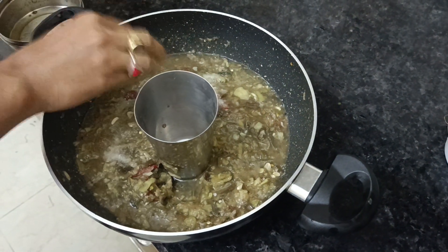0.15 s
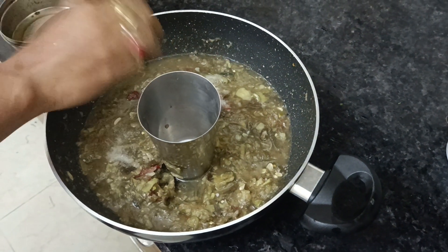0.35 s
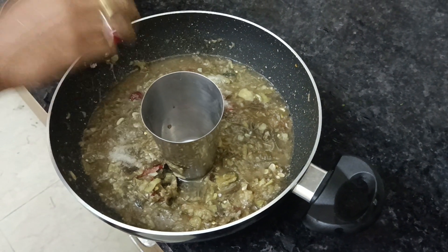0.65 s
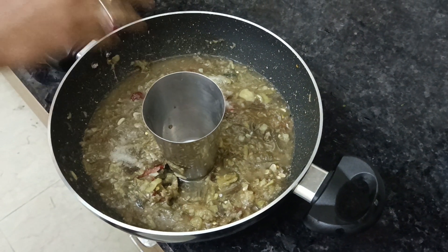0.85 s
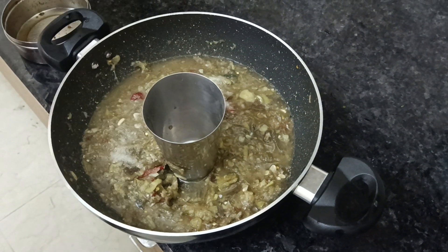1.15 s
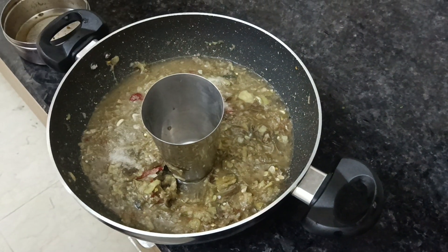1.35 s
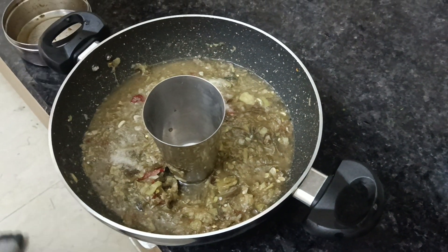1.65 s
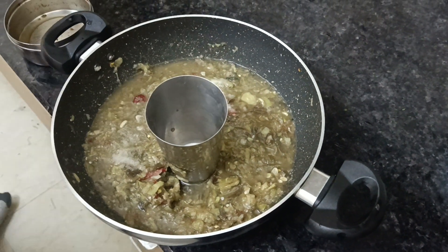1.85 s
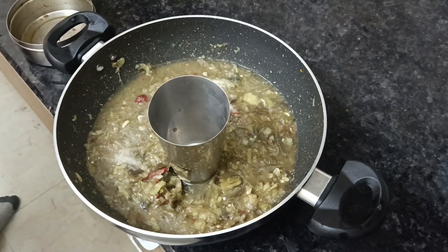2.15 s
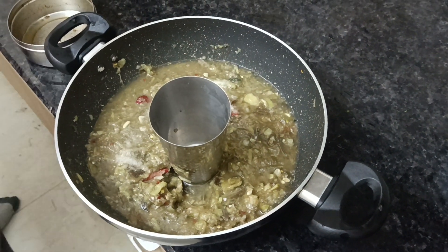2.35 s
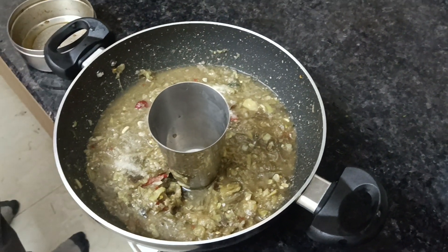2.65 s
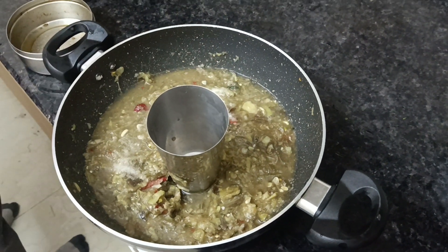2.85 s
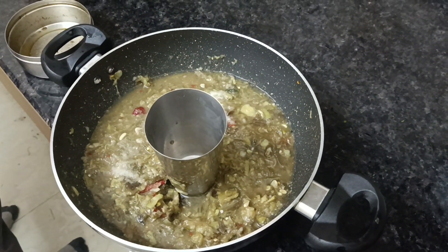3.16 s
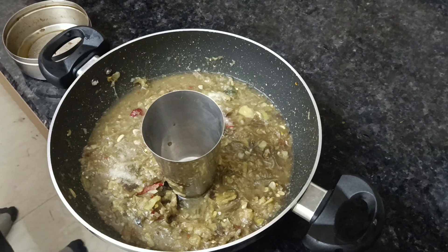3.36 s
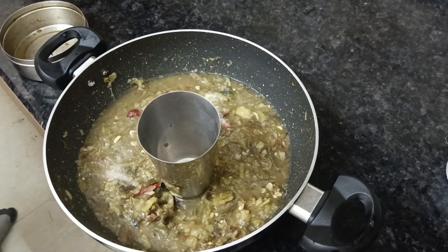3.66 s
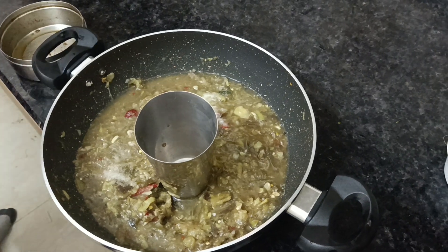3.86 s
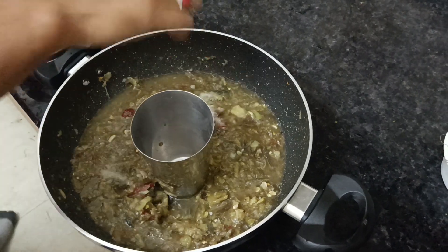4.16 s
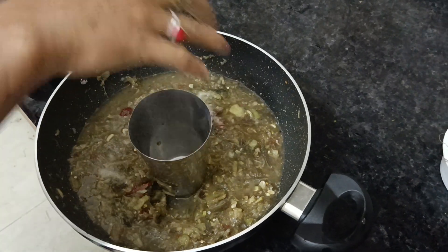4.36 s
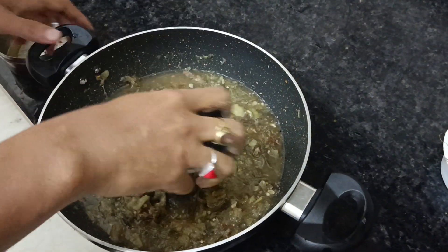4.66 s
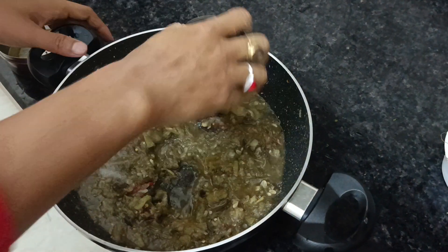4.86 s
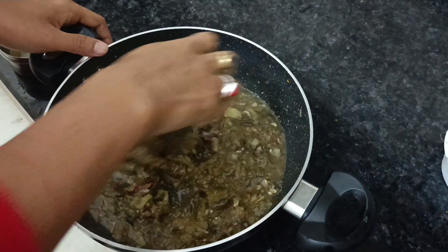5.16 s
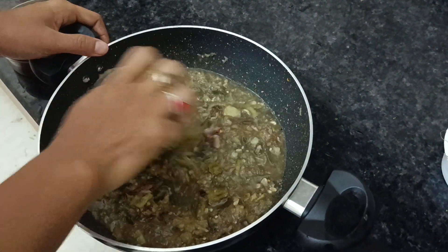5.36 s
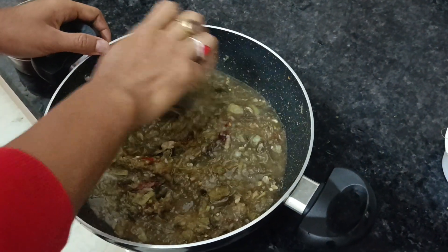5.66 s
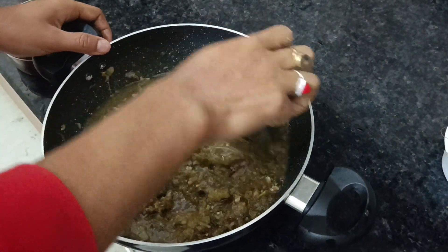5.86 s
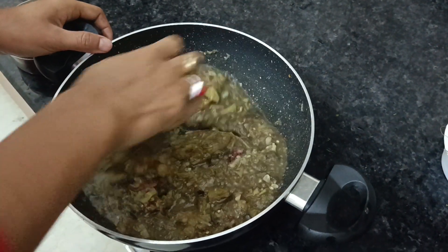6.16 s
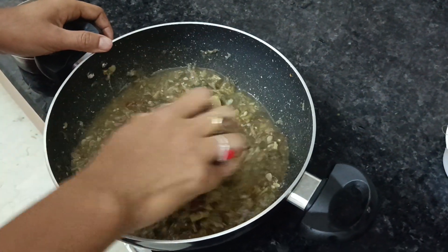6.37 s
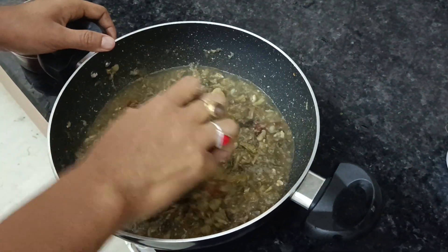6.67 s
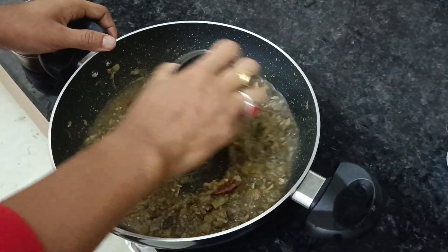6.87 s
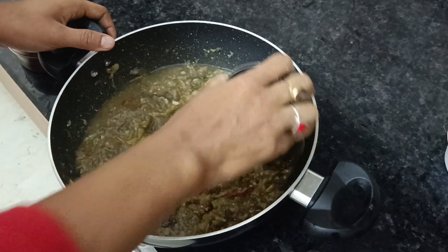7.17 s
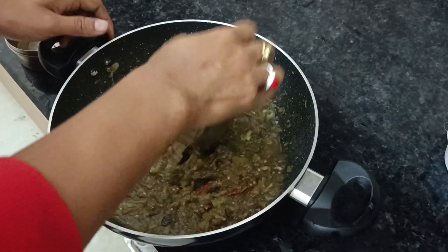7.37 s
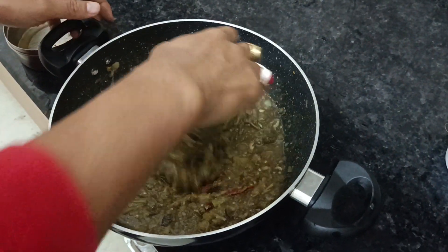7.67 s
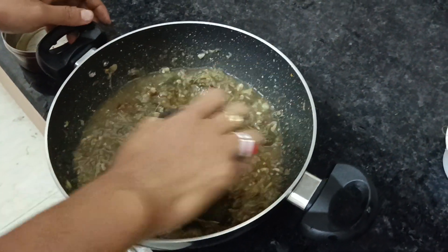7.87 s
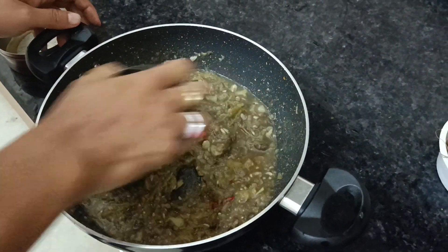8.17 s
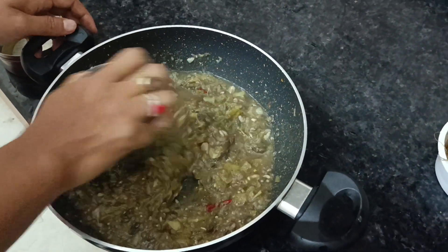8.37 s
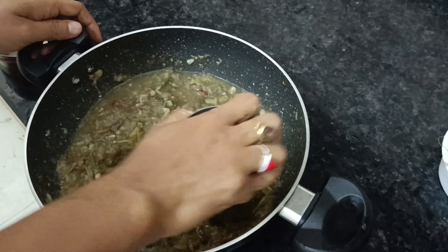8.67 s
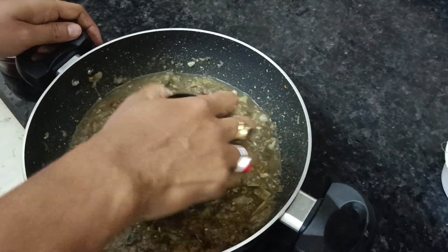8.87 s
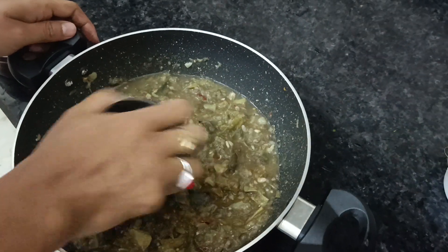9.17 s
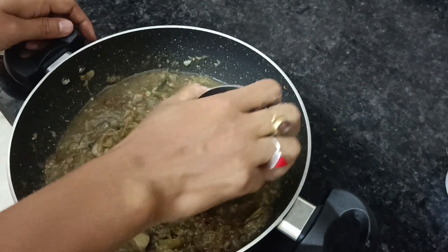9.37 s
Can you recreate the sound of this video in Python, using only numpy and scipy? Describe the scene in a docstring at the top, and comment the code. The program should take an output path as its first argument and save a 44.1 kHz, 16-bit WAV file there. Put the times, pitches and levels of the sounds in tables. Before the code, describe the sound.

First a few tiny taps and metallic ticks, then snapping, rustling thin plastic and a low double thud as something soft and heavy is put down. A near-silent gap follows. Then irregular wet presses: air pops ring the hollow of a steel tumbler around a mid-low pitch, pulp crackles, and its rim clinks damply on the pan, once stuttering. Close pickup, short bright kitchen reverberation, faint hiss and low hum.

```python
"""Tumbler mashing wet vegetables

A steel tumbler presses a wet mixture in a pan, in a small hard-walled kitchen with hiss and a rising drone.
Early on come light ticks (ringing modes), crumpling thin plastic (snap swarms) and the thud of a load put down.
Presses pop trapped air, which rings the tumbler's hollow, while the pulp crackles and bubbles.
In between, steel clinks (click bursts through modes) and once judders on the pan."""
import sys
import numpy as np
from scipy import signal
from scipy.fft import rfft, irfft
from scipy.io import wavfile

SR = 44100
rng = np.random.default_rng(int(sys.argv[2]) if len(sys.argv) > 2 else 0)


def wav_out(sig):
    """Save sig, one row per channel (or a flat mono array), as 16-bit PCM at SR to the path in sys.argv[1]."""
    wavfile.write(sys.argv[1], SR, np.round(np.clip(np.atleast_2d(sig).T, -1, 1) * 32767).astype(np.int16))


N = 419832
SIZE = 32768  # samples per event
T = np.arange(SIZE) / SR


def undb(db):
    """Amplitude factor of a level in dB."""
    return 10 ** (np.asarray(db) / 20)


def unit(x):
    """Scale to an energy of 1."""
    return x / np.sqrt(np.sum(x ** 2) + 1e-18)


def at_hz(points, hz):
    """Read a (f/Hz, value) table on a log-frequency axis."""
    f, value = np.transpose(points)
    return np.interp(np.log(hz + 1), np.log(f), value)


def colour(x, points):
    """Minimum-phase filter with a (f/Hz, gain/dB) spectrum, by folding the cepstrum."""
    size = x.shape[-1]
    gain = undb(at_hz(points, np.fft.rfftfreq(size, 1 / SR)))
    cepstrum = irfft(np.log(gain), size)
    cepstrum[1:size // 2] *= 2
    cepstrum[size // 2 + 1:] = 0
    return irfft(rfft(x) * np.exp(rfft(cepstrum)), size)


def low_cut(x, hz):
    """Second-order high-pass."""
    return signal.sosfilt(signal.butter(2, hz, "high", fs=SR, output="sos"), x)


def drive(force, response):
    """Convolve a force with an impulse response."""
    return irfft(rfft(force, 2 * SIZE) * rfft(response, 2 * SIZE))[..., :SIZE]


def ring(modes, scatter_db, detune=0):
    """Sum of decaying modes; the point of contact and the grip shift their weights and pitches."""
    t, out = T.astype(np.float32), 0
    draws = rng.standard_normal((len(modes), 3))
    for (hz, db, t60), (weight, shift, sign) in zip(modes, draws):
        fade = np.exp(-np.minimum(float(np.log(1000) / t60) * t, 20))
        wave = np.sin(float(2 * np.pi * hz * (1 + detune * shift)) * t)
        amplitude = float(np.sign(sign) * undb(db + scatter_db * weight))
        out = out + amplitude * fade * wave
    return unit(out)


def clicks(length, rate, scatter_db, first=0, rise=0):
    """Random clicks at rate/Hz, swelling over the share 'rise'; an opening one has the energy share 'first'."""
    levels_db = scatter_db * np.minimum(rng.exponential(size=SIZE), np.pi)
    sizes = undb(levels_db) * rng.choice([-1, 1], SIZE)
    progress = T / max(length, 1 / SR)
    gate = np.exp(-progress ** 4) * np.minimum(progress / max(rise, 1e-6), 1)
    hits = rng.random(SIZE) < rate / SR
    share = np.clip(first, 0, 1)
    train = np.sqrt(1 - share) * unit(sizes * hits * gate)
    train[0] += np.sqrt(share)
    return train


def bubbles(length, low_hz, high_hz, cycles, count):
    """Tiny bubbles burst at random moments, each a short chirp gliding upwards."""
    out, t = np.zeros(2 * SIZE), T[:SIZE // 32]
    for when, pitch, size in rng.random((count, 3)):
        hz = low_hz * (high_hz / low_hz) ** pitch
        age = t * hz / cycles
        glide = 1 + .1 * np.tanh(age / 2)
        start = int(when * min(length, T[-1]) * SR)
        out[start:start + len(t)] += size ** 2 * np.exp(-age) * np.sin(2 * np.pi * hz * t * glide)
    return unit(out[:SIZE])


PORT_GAP_M, SOUND_SPEED_M_PER_S = 0.18, 343


def diffuse(size):
    """Noise arriving from all sides at two ports: alike in the bass, unrelated in the treble."""
    likeness = np.sinc(2 * np.fft.rfftfreq(size, 1 / SR) * PORT_GAP_M / SOUND_SPEED_M_PER_S)
    mid, side = rfft(rng.standard_normal((2, size)))
    mid = mid * np.sqrt(1 + likeness)
    side = side * np.sqrt(1 - likeness)
    return irfft(np.array([mid + side, mid - side]), size) / np.sqrt(2)


# room decay: (f/Hz, t60/s)
ROOM_T60 = [(100, 0.66), (500, 0.47), (1500, 0.43), (3500, 0.37), (7000, 0.34), (15000, 0.19)]
DIRECT_DB, CEILING_DB, CEILING_S = -3.5, -9, 0.011
PORT_LAG_S, TAIL_ONSET_S = .00032, 0.00043


def room():
    """Direct path, ceiling echo and a tail whose treble dies first."""
    hz, s, cells = signal.stft(diffuse(SIZE), SR)
    fade = undb(-60 * s / at_hz(ROOM_T60, hz)[:, None])
    tail = signal.istft(cells * fade, SR)[1][:, :SIZE] * (1 - np.exp(-T / TAIL_ONSET_S))
    response = np.sqrt(2) * unit(tail)
    response[0, 0] += undb(DIRECT_DB)
    response[1, int(PORT_LAG_S * SR)] += undb(DIRECT_DB)
    response[:, int(CEILING_S * SR)] += undb(CEILING_DB)
    return response


def band_levels(db, balance_db, brightness_db=0, tilt=0):
    """Band levels of one event from its level, its material's balance and its brightness."""
    return db + np.array(balance_db) + brightness_db * np.array(tilt)


# low, middle, high, top band: (from f/Hz, to f/Hz)
BANDS = [(250, 900), (900, 3500), (3500, 9000), (9000, 16000)]
BAND_FILTERS = [signal.butter(4, band, "band", fs=SR, output="sos") for band in BANDS]


def voiced(x, length, levels_db):
    """Tilt a sound smoothly until its upper bands approach the given levels while it lasts."""
    count = len(levels_db)
    centres = np.sqrt(np.prod(BANDS, axis=1))[-count:]
    body = int((length + .03) * SR)
    x = x * np.minimum(10 * (1 - T / T[-1]), 1)  # end fade
    for _ in range(2):
        mono = x.mean(axis=0)[:body]
        rms = np.array([np.std(signal.sosfilt(sos, mono)) for sos in BAND_FILTERS[-count:]])
        now_db = 20 * np.log10(rms + 1e-12)
        x = colour(x, np.column_stack([centres, np.subtract(levels_db, now_db)]))
    return x


# hiss spectrum before low cut and scaling: (f/Hz, relative level/dB)
HISS_SPECTRUM = [(18, -74), (30, -39), (70, -34), (81, 5.5), (100, 7.5), (170, -10), (311, -8.5),
                 (384, -17), (600, -18), (1430, -20.5), (2980, -21), (6210, -31.5), (8520, -29.5),
                 (9460, -41), (16000, -27.5)]
HISS_DB, DRONE_DB, DRONE_RISE_DB_PER_S = -60, -60, 0.63


def background():
    """Faint even hiss of the kitchen over a low, slowly growing drone, both filtered diffuse noise."""
    hiss = low_cut(colour(diffuse(N), HISS_SPECTRUM), hz=165)
    drone_spectrum = [(25, -47), (50, -23.0), (75, -22.0), (97, 3.0), (108, -3), (135, -20.0), (300, -37.5)]
    drone = colour(diffuse(N), drone_spectrum)
    drone_db = DRONE_DB + DRONE_RISE_DB_PER_S * np.arange(N) / SR
    hiss = undb(HISS_DB) * hiss / np.std(hiss.mean(axis=0))
    return hiss + undb(drone_db) * drone / np.std(drone)


# dry taps: (t/s, f/Hz, amplitude before decay/dB)
TAPS = [(.133, 700, -41), (.328, 1870, -38.5), (.472, 2400, -39), (7.918, 320, -30.5)]


def taps():
    """Dull decaying sines of a cycle or two, too close to stir the room."""
    for s, hz, db in TAPS:
        tap = undb(db) * np.exp(-T * hz) * np.sin(2 * np.pi * hz * T)
        yield s, np.array([tap, tap])


# light metal ticks: (t/s, level/dB, brightness/dB)
TICKS = [(.245, -64.5, 10.5), (.481, -41, 3.5), (.491, -51, 1), (.684, -64, 14.5), (.7, -56, 0),
         (.885, -48.5, 0.5), (3.94, -56.5, 3), (5.382, -47, -2.5), (7.131, -47, -1)]
# small metal: (f/Hz, level/dB, t60/s)
TICK_MODES = [(2300, -9, .03), (2950, -2, .07), (3150, -5, .06), (5200, -6, .04), (5750, -2, .05),
              (6130, -2, .07), (6330, -2, .05), (7400, -6, .04), (8300, -7, .03), (10500, -4, .04),
              (11050, -4, .05), (12600, -7, .03), (14700, -7, .03)]
# hard contact before voicing, also in clinks: (f/Hz, relative level/dB)
CONTACT = [(60, -19), (300, -35), (900, -4.5), (1700, 9), (2600, 8), (4000, 6.5), (5200, 4), (6700, 8.5),
           (9400, -2), (12000, -2.5), (16000, -6.5)]
# (middle/dB, high/dB, top/dB) re event level
TICK_BALANCE_DB = (-14, -2, -5)
# harder contact trades bass for treble, also in clinks: (low, middle, high, top), dB per dB brightness
CONTACT_TILT = (-0.5, -0.68, 0.46, 1.6)


def ticks(paths):
    """Small metal touches: one sharp click and a thin ring."""
    for k, (s, db, brightness_db) in enumerate(TICKS):
        click = unit(colour(1. * (T == 0), CONTACT))
        sound = click + ring(TICK_MODES, scatter_db=2)
        levels_db = band_levels(db, TICK_BALANCE_DB, brightness_db, CONTACT_TILT[1:])
        yield s, voiced(drive(sound, paths[k % len(paths)]), 0, levels_db)


# crumples of thin plastic: (t/s, length/s, level/dB, brightness/dB)
CRUMPLES = [(1.123, 0.017, -54.5, -12), (1.172, 0.027, -47, -6.5), (1.231, 0.05, -32, 0),
            (1.287, 0.051, -29.5, -1.5), (1.365, 0.25, -43, 1.5), (1.464, 0.041, -28, -6),
            (1.535, 0.021, -37, 1.5), (1.778, 0.094, -38, -5), (1.912, 0.016, -39, 1.5),
            (1.946, .005, -38.5, 8.5), (2.02, 0.2, -49, -5.5), (2.104, 0.017, -36.5, 2),
            (2.15, 0.017, -38, 2), (2.351, 0.01, -45.5, 7.5), (2.48, 0.023, -54, 0),
            (2.516, 0.022, -41, -7), (2.543, 0.069, -37.5, 3.5), (2.635, 0.054, -42, 2),
            (2.718, .1, -39.5, 0), (2.885, 0.023, -46, -4), (2.999, 0.16, -41, 4.5),
            (3.049, 0.045, -28.5, -5.5), (3.17, 0.069, -51.5, -5), (3.429, 0.012, -44.5, 9.5),
            (3.78, 0.0033, -53, -1.5)]
# plastic is handled: (from t/s, to t/s)
HANDLINGS = [(1.2, 1.65), (1.97, 3.32)]
# snap spectrum before voicing: (f/Hz, relative level/dB)
PLASTIC = [(50, -33), (110, -3), (500, 0.5), (800, -2), (1500, 0), (2450, 1), (3200, -4.5), (5000, -10.5),
           (7000, -13.5), (9400, -29.5), (12000, -31), (16000, -36)]
# (low/dB, middle/dB, high/dB, top/dB) re event level
PLASTIC_BALANCE_DB = (-8, 1, -2, -8)
# sharper creases add treble: (low, middle, high, top), dB per dB brightness
CREASE_TILT = (0.049, 0.086, 0.86, 0.94)
RUSTLE_STEP_S, RUSTLE_DB, RUSTLE_SCATTER_DB, RUSTLE_BRIGHTNESS_DB = .1, -54, 6.5, -3


def bag(paths):
    """Thin plastic buckles in swarms of tiny snaps, and rustles softly all the while it is handled."""
    rustles = []
    for start, end in HANDLINGS:
        for s in np.arange(start, end, RUSTLE_STEP_S):
            db = RUSTLE_DB + RUSTLE_SCATTER_DB * rng.standard_normal()
            rustles.append((s, RUSTLE_STEP_S, db, RUSTLE_BRIGHTNESS_DB))
    for k, (s, length, db, brightness_db) in enumerate(CRUMPLES + rustles):
        snaps = colour(clicks(length, rate=1100, scatter_db=4, first=0.078, rise=0.034), PLASTIC)
        levels_db = band_levels(db, PLASTIC_BALANCE_DB, brightness_db, CREASE_TILT)
        yield s, voiced(drive(snaps, paths[k % len(paths)]), length, levels_db)


# the load lands: (t/s, level/dB)
THUDS = [(3.052, -21), (3.079, -22)]
# surface under the load: (f/Hz, level/dB before low cuts, t60/s)
THUD_MODES = [(102, -7, .3), (160, 1, .18), (202, 1, .13), (268, -4, .12), (318, -5, .12), (410, -9, .08)]


def thuds(paths):
    """A soft load lands and settles, booming in the modes of the surface under it."""
    for s, db in THUDS:
        surface = low_cut(low_cut(ring(THUD_MODES, scatter_db=0), hz=75), hz=75)
        path = undb(-4) * paths[0] + (T == 0)
        boom = low_cut(drive(surface, path), hz=70)
        yield s, undb(db) * boom / np.std(boom[:, :SR // 20])


# the hand reaches in and takes hold: (t/s, length/s, level/dB)
BRUSHES = [(4.2, 0.099, -60.5), (4.53, 0.26, -62)]
# (low/dB, middle/dB, high/dB, top/dB) re event level
SKIN_BALANCE_DB = (-18, -1.5, 0.5, 0.5)


def brushes(paths):
    """Skin and sleeve brush past in a soft swell of fine friction clicks."""
    for k, (s, length, db) in enumerate(BRUSHES):
        rubbing = low_cut(clicks(length, rate=3000, scatter_db=12, rise=0.12), hz=250)
        yield s, voiced(drive(rubbing, paths[k % len(paths)]), length, band_levels(db, SKIN_BALANCE_DB))


# the hand grips the tumbler and slides along its wall: (t/s, length/s, level/dB)
SLIDES = [(4.732, 0.054, -46)]
# thin tumbler wall: (f/Hz, level/dB, t60/s)
WALL_MODES = [(2750, 2, 0.063), (4920, -6, 0.14), (8000, 3, 0.14), (9000, -9, 0.17), (11900, -1, 0.22),
              (13000, -7, .25)]


def slides(paths):
    """Finger rings rub the tumbler's wall and make its modes sing faintly."""
    for s, length, db in SLIDES:
        rubbing = clicks(length, rate=2700, scatter_db=4, rise=0.37)
        singing = drive(drive(rubbing, ring(WALL_MODES, scatter_db=0)), paths[0])
        yield s, undb(db) * singing / np.std(singing[:, :int(length * SR)])


# steel knocks and grazes: (t/s, length/s, level/dB, brightness/dB)
CLINKS = [(4.987, 0.023, -55.5, 2.5), (5.262, 0.0045, -68, 8), (5.679, 0.0045, -33, 2),
          (5.973, 0.0073, -52.5, 1), (6.223, 0.0032, -50.5, 9.5), (6.687, 0.04, -52, 3.5),
          (7.06, 0.043, -64, 5.5), (7.2, 0.01, -43.5, 0.5), (7.435, 0.0032, -53, 0),
          (7.545, .004, -33, 1.5), (7.77, 0.0038, -58, -1.5), (7.873, 0.013, -46, -2.5),
          (8.315, 0.0028, -34, -1.5), (8.743, 0.0097, -30.5, -1.5), (8.892, 0.0075, -46, 1.5),
          (9.099, 0.0011, -21.5, -9.5), (9.473, 0.0064, -49.5, -5)]
# tumbler and pan, metal on metal, also in judders: (f/Hz, level/dB before scatter, t60/s)
STEEL_MODES = [(572, -8, .16), (646, -3, .18), (1168, -10, .05), (1370, -15, .04), (1771, -5, .16),
               (1857, -8, .08), (2143, -9, .08), (2293, -8, .15), (2471, -4, .16), (2568, -2, .22),
               (2681, -5, .16), (3144, -9, .12), (3445, -9, .08), (4700, -6, .06), (5959, -4, .07),
               (6400, -3, .06), (6767, -3, .06), (7300, -4, .06), (8500, -6, .05), (10900, -7, .06)]
# (low/dB, middle/dB, high/dB, top/dB) re event level
STEEL_BALANCE_DB = (-11, -3, -0.5, -3)


def clinks(paths):
    """The rim strikes the pan and chatters briefly; the hand and the mash damp the ring."""
    for k, (s, length, db, brightness_db) in enumerate(CLINKS):
        # the longer the graze, the less its first contact stands out
        first = 0.3 * np.exp(-length / 0.0088)
        force = clicks(length, rate=8000, scatter_db=3.0, first=first, rise=0.1)
        steel = ring(STEEL_MODES, scatter_db=3, detune=.003)
        sound = unit(colour(force, CONTACT)) + undb(-12) * unit(drive(force, steel))
        levels_db = band_levels(db, STEEL_BALANCE_DB, brightness_db, CONTACT_TILT)
        yield s, voiced(drive(low_cut(sound, hz=198), paths[k % len(paths)]), length, levels_db)


# the rim judders over the pan: (t/s, length/s, level/dB)
JUDDERS = [(9.115, .12, -28), (9.215, 0.089, -31)]
# slip spectrum before voicing: (f/Hz, relative level/dB)
RIM = [(80, -36), (400, -51), (1000, -3), (1800, 4), (2550, 6), (3200, -3), (3900, -17.5), (4700, -21),
       (5150, -47), (5700, -22.5), (6800, -16.5), (8200, -39), (10500, -29), (16000, -38)]
# (low/dB, middle/dB, high/dB, top/dB) re event level
JUDDER_BALANCE_DB = (-6.5, 2, -10, -29)


def judders(paths):
    """Pressed hard, the rim sticks and slips over the pan and sets the tumbler's hollow humming."""
    for k, (s, length, db) in enumerate(JUDDERS):
        force = clicks(length, rate=970, scatter_db=2.5, first=0.0096)
        slips = colour(force, RIM)
        steel = unit(drive(slips, ring(STEEL_MODES, scatter_db=1)))
        hollow = unit(drive(force, ring(HOLLOW_MODES, scatter_db=1)))
        sound = low_cut(unit(slips) + undb(-10) * steel + undb(-9.5) * hollow, hz=148)
        levels_db = band_levels(db, JUDDER_BALANCE_DB)
        yield s, voiced(drive(sound, paths[k % len(paths)]), length, levels_db)


# tumbler's air column and loaded pan, also in judders: (f/Hz, level/dB before scatter, t60/s)
HOLLOW_MODES = [(317, -10, .24), (408, -9, .22), (458, -11, .18), (572, -6, .18), (596, -6, .12),
                (649, -1, .2), (690, -6, .15), (754, -13, .15), (868, -11, .15), (1080, -17, .06),
                (1750, -21, .06), (2340, -23, .04)]
# pulp and wet-crackle spectra before voicing: (f/Hz, relative level/dB)
MASH = [(60, -19), (150, 26), (260, -29.5), (380, -16), (640, 8.5), (950, -11.5), (2000, -12.5),
        (4000, -36.5), (16000, -77)]
WET = [(100, -14), (700, 13), (1300, 7), (2400, 9), (3500, 2), (6500, -5), (9400, -5), (12000, 1.5),
       (16000, -20)]


def squelch(length, first, pocket_hz):
    """Air pockets pop and ring the tumbler's hollow; squeezed wet pulp crackles and bubbles."""
    pops = clicks(length, rate=540, scatter_db=6, first=first, rise=0.29)
    hollow = ring(HOLLOW_MODES, scatter_db=3, detune=.004)
    pocket = ring([(pocket_hz, 0, .025)], scatter_db=0)
    pulp = unit(colour(1. * (T == 0), MASH))
    body = low_cut(undb(-2) * hollow + pocket + undb(-2) * pulp, hz=280)
    # smaller and larger pockets collapse around the main one
    gulps = bubbles(length, low_hz=0.642 * pocket_hz, high_hz=2.25 * pocket_hz, cycles=5.2, count=7)
    crackle = colour(clicks(length + .015, rate=350, scatter_db=7, rise=.3), WET)
    fizz = bubbles(length + .03, low_hz=1100, high_hz=7500, cycles=6, count=12)
    wet = undb(-26.0) * unit(crackle) + undb(-23) * fizz
    return unit(drive(pops, body)) + undb(-11.5) * low_cut(gulps, hz=260) + wet


# presses: (t/s, length/s, first pop's energy share/0-1, air pocket f/Hz, level/dB, wet crackle/dB)
PRESSES = [(4.63, 0.088, 0.7, 657, -62, -1.5), (4.76, 0.075, 0.3, 316, -52, 0),
           (5.03, .07, 0.2, 654, -54, 5), (5.095, .029, 0.57, 680, -40.5, 1.5),
           (5.263, .019, 0.8, 650, -55.5, -9), (5.42, .07, 0.74, 566, -56.5, -2.5),
           (5.787, .038, 0.62, 538, -32, 2), (6.147, .062, 0.5, 585, -42, 2),
           (6.384, .045, 0.28, 677, -38, 2.5), (6.43, .12, 0.34, 643, -39, 2.5),
           (6.552, 0.023, 0.43, 656, -25.5, -2), (6.75, 0.12, 0.16, 650, -52, -3),
           (6.904, .026, .02, 707, -34.5, -6.5), (6.936, .014, 0.5, 684, -34.5, 2.5),
           (6.975, .033, 0.72, 595, -32.5, 1), (7.306, 0.017, 0.73, 654, -23.5, -2),
           (7.683, .026, 0.86, 469, -40.5, -4), (8.003, .03, 0.55, 508, -29, -3),
           (8.075, 0.035, 0.3, 556, -46, -7), (8.12, .03, 0, 563, -51, 1.5),
           (8.488, .038, 0.13, 477, -38, -9.5), (8.525, .032, 0.16, 477, -39, 1),
           (8.892, .03, 0.76, 606, -34.5, -1), (9.266, .02, 0.98, 568, -25.5, -0.5),
           (9.291, .036, 0.98, 545, -29, -3)]
# (low, middle, high, top): levels at PRESS_DB; growth in dB per dB of effort; gain in dB per dB of wet crackle
PRESS_DB, PRESS_BANDS_DB = -35, (-35.5, -43.5, -56.5, -68)
PRESS_GROWTH, WET_TILT = (1, 0.76, 0.19, -0.18), (0, 1, 1, 1)
# the pulp starts to give before each press, equally faintly whatever the effort
YIELD_S, YIELD_BANDS_DB = .055, (-56.5, -65, -65.5, -75)


def presses(paths):
    """The pulp gives, then squelches: the harder the press, the hollower the sound."""
    for k, (s, length, first, pocket_hz, db, wet_db) in enumerate(PRESSES):
        path = paths[k % len(paths)]
        effort_db = (db - PRESS_DB) * np.array(PRESS_GROWTH)
        levels_db = np.array(PRESS_BANDS_DB) + effort_db + wet_db * np.array(WET_TILT)
        giving = squelch(YIELD_S, 0, pocket_hz)
        yield s - YIELD_S, voiced(drive(giving, path), YIELD_S, YIELD_BANDS_DB)
        pressed = low_cut(squelch(length, first, pocket_hz), hz=173)
        yield s, voiced(drive(pressed, path), length, levels_db)


def add(out, s, x):
    """Mix a sound in at time s."""
    start = int(s * SR)
    out[:, start:start + SIZE] += x[:, :N - start]


def scene():
    """All sounds in one room; sources move, so successive ones take different paths to the microphone."""
    paths = [room() for _ in range(8)]
    out = background()
    sources = (taps(), ticks(paths), bag(paths), thuds(paths), brushes(paths), slides(paths),
               clinks(paths), judders(paths), presses(paths))
    for source in sources:
        for s, sound in source:
            add(out, s, sound)
    return out


# microphone ports: (f/Hz, left minus right level/dB)
PORTS = [(100, -3), (550, 1), (1300, -3.5), (2500, -5.5), (4500, -4), (6500, -8), (8300, -2.5), (9400, 5),
         (10500, 13), (12300, 17), (15500, 13.5)]
TOP_HZ = 15850


def record(dry):
    """Each port has its own colour; tanh rounds the peaks and an elliptic low-pass cuts the top."""
    hz, tilt_db = np.transpose(PORTS)
    mean_db = 10 * np.log10((1 + undb(tilt_db) ** 2) / 2)
    left = colour(dry[0], np.column_stack([hz, tilt_db - mean_db]))
    right = colour(dry[1], np.column_stack([hz, -mean_db]))
    top_cut = signal.ellip(10, .2, 80, TOP_HZ, fs=SR, output="sos")
    return signal.sosfilt(top_cut, np.tanh([left, right]))


dry = scene()
out = record(dry)
wav_out(out)
```